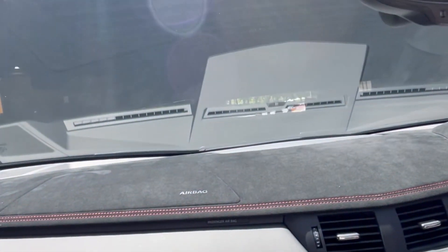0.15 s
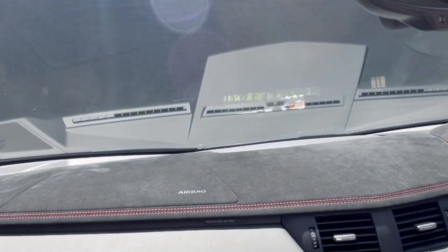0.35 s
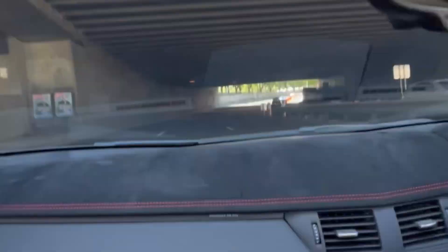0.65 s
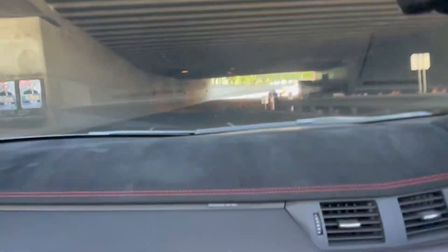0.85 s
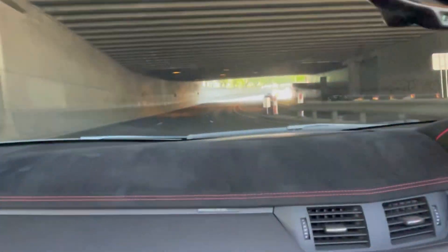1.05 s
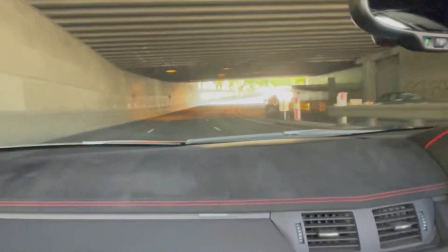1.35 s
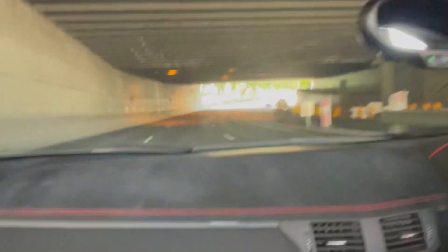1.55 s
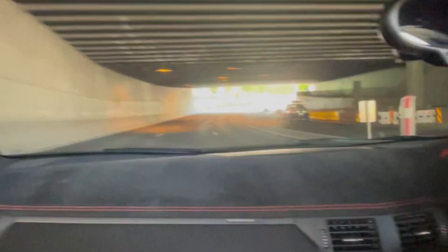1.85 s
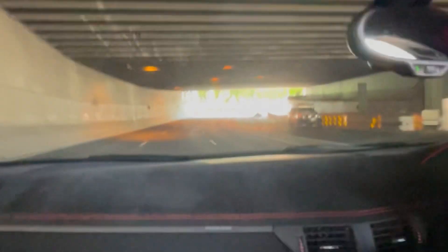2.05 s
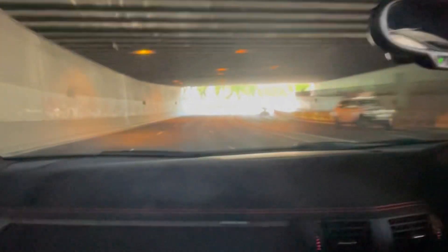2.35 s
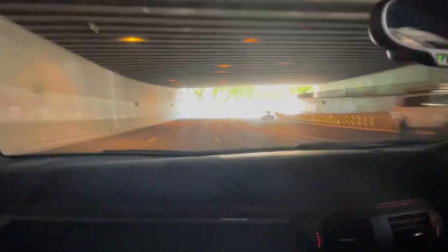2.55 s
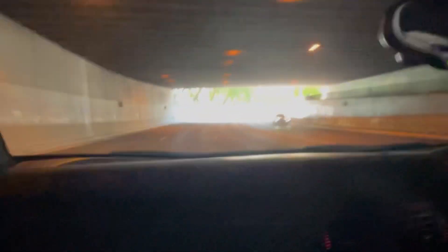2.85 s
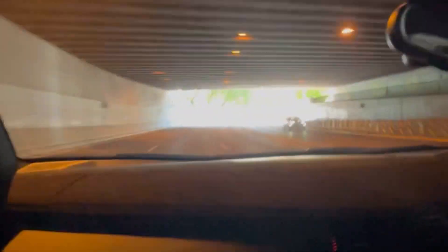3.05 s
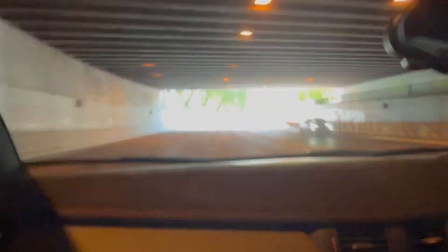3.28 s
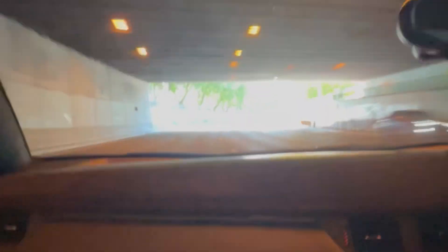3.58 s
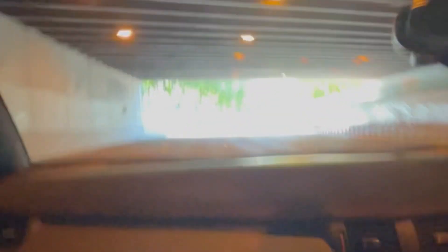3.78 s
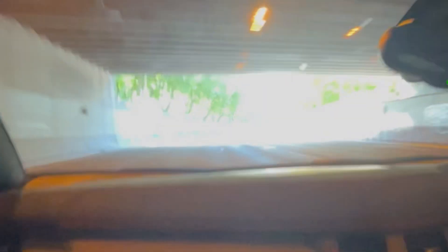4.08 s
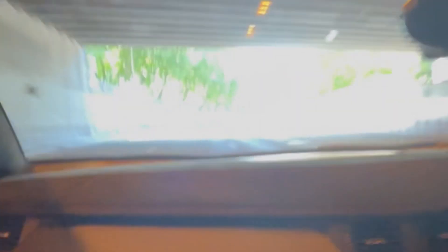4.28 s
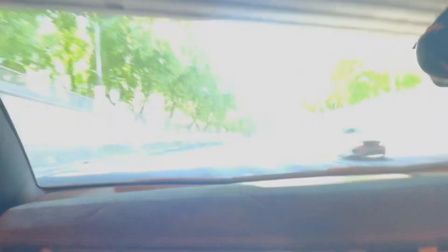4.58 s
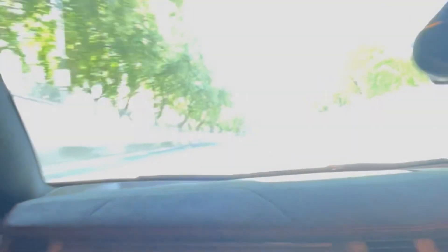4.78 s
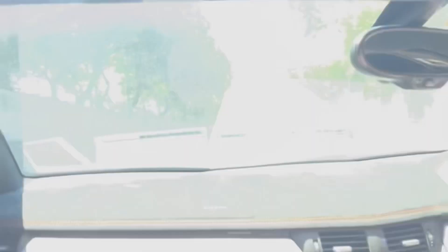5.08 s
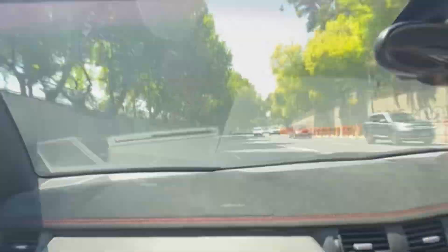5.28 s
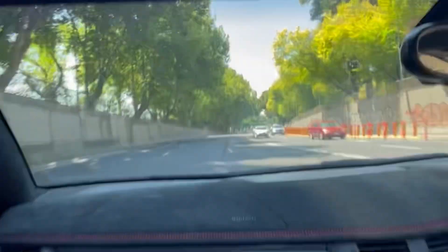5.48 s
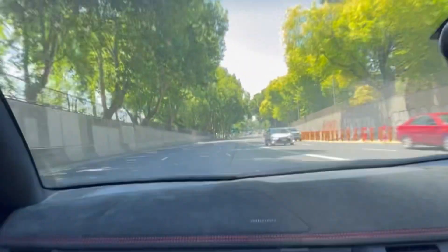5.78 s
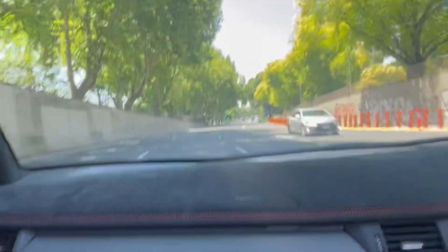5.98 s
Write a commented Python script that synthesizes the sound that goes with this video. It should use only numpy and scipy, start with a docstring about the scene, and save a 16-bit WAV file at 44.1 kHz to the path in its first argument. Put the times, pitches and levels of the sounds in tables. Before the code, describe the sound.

From inside a sports car, a twelve-cylinder engine hums over low road rumble and a few dull bumps. At about 0.7 seconds it kicks down a gear with thuds and exhaust pops, and the revs jump. Two faint, thin squeaks come at 0.7 and 1.1 seconds while the note shudders. From 1.5 seconds the loud wail climbs steadily, with exhaust rasp, intake hiss and a deep cabin boom. The concrete tunnel smears the rising notes into a long, throbbing echo. A brief harsh rush swells near 2.9 seconds, and the growl thins into a scream, reaching its highest pitch around 4.2 seconds. At 4.4 seconds the engine shifts up, dips briefly and holds a lower, steady note. At about 5.4 seconds the throttle lifts with a few soft thuds, leaving mostly tyres and wind over a faint engine until the end, just after 6 seconds.

```python
"""Inside a V12 sports car that speeds through a road tunnel.
At first the engine hums over the rumble of the road. It kicks down a gear with thuds and thin squeaks.
Then two banks of six cylinders wail higher and higher; the tunnel smears the rising notes, the exhaust
rasps and the cabin booms with the crankshaft. Near the exit, at about 4.4 s, the engine shifts up and
holds its speed. At about 5.4 s the driver lifts off, leaving mostly tyres and wind."""
import sys
import numpy as np
from scipy import signal
from scipy.fft import rfft, irfft, next_fast_len
from scipy.io import wavfile
from scipy.ndimage import uniform_filter1d, minimum_filter1d

SR = 44100
rng = np.random.default_rng(int(sys.argv[2]) if len(sys.argv) > 2 else 0)


def pcm_store(signal):
    """Save signal as 16-bit PCM."""
    levels = np.round(np.clip(np.atleast_2d(signal), -1, 1) * 32767)
    wavfile.write(sys.argv[1], SR, levels.astype(np.int16).T)


N = 270200

# Engine speed, as how often one bank fires; it shudders as the tyres fight for grip: time_s, firing_hz
FIRING_RATE = [(0, 104.7), (.62, 105.6), (.69, 105.2), (.74, 120.4), (.8, 151.6), (.92, 173.4),
               (.98, 184.9), (1.04, 178), (1.1, 189.2), (1.17, 174.8), (1.28, 189.9), (1.5, 196.6),
               (2, 238.6), (2.6, 290.9), (3.4, 352.8), (3.8, 380.3), (4.2, 405.9), (4.36, 402.3),
               (4.47, 345.7), (4.56, 313.9), (4.82, 307.2), (5.05, 315.5), (5.3, 317.3), (6.13, 303.8)]
# How hard the engine works, as base levels: time_s, twelve_beat_note_db, rasp_db, intake_db
ENGINE_LOAD = [(0, -40, -32, -45.5), (.3, -31, -34, -47), (.67, -25, -32, -43.5), (.71, -25, -27, -42.5),
               (.9, -17, -25.5, -38), (1.05, -21.5, -24, -39.5), (1.3, -22, -25, -40.5),
               (1.55, -24, -22.5, -45.5), (1.84, -24.5, -24, -41.5), (1.93, -20.5, -20.5, -38.5),
               (2.2, -20, -24, -45.5), (2.4, -18, -22, -44), (2.92, -20, -21, -45),
               (3.02, -20.5, -25.5, -48.5), (3.35, -24, -23.5, -47.5), (3.85, -26.5, -24.5, -46.5),
               (4.31, -25, -25, -47), (4.42, -30, -31, -52.5), (4.54, -40, -32, -53.5),
               (4.61, -30, -35.5, -58), (4.95, -27.5, -31.5, -53), (5.12, -30, -32.5, -52),
               (5.33, -32, -34, -53), (5.43, -51.5, -41.5, -58), (6.13, -51, -44, -57)]
# Walls ahead send a note back higher, walls behind send it back lower: pitch_ratio, level_db
WALL_SHIFTS = [(1.06, -8), (1, 0), (.965, -1), (.925, -2), (.885, -4), (.84, -10)]
# The tone colour of rushing air: frequency_hz, level_db
AIR_SPECTRUM = [(800, -30), (2000, -2), (3200, -1), (4400, -4.5), (5200, 2), (6500, 0), (8000, -4),
                (9500, -8), (10800, -6), (11800, -14), (12700, -30)]
THIN_ABOVE_HZ = 309  # above this firing rate the twelve-beat note, the roar and the rasp thin out


def amp(db):
    """Turn decibels into a number to multiply by."""
    return 10 ** (np.asarray(db) / 20)


def unit(x):
    """Scale a signal to an average (rms) level of 1."""
    return x / np.sqrt(np.mean(x ** 2) + 1e-20)


def along(points, hz):
    """Read between (frequency_hz, value) points, with octaves evenly spaced."""
    frequencies, values = np.transpose(points)
    return np.interp(np.log(hz + 1), np.log(frequencies + 1), values)


def curves(rows):
    """Give one value per sample for each column after the time."""
    times, *columns = np.transpose(rows)
    return [np.interp(np.arange(N) / SR, times, column) for column in columns]


def octaves_above(hz):
    """How far the firing rate is above hz; zero below it."""
    return np.maximum(np.log2(curves(FIRING_RATE)[0] / hz), 0)


def octaves_below(hz):
    """How far the firing rate is below hz; zero above it."""
    return np.maximum(np.log2(hz / curves(FIRING_RATE)[0]), 0)


def hump(middle_s, length_s):
    """One smooth rise from 0 to 1 and back."""
    return np.cos(np.pi * np.clip((np.arange(N) / SR - middle_s) / length_s, -.5, .5))


def wobble(rate_hz):
    """A smooth curve through rate_hz random points a second."""
    points = rng.standard_normal(int(N * rate_hz / SR) + 4)
    smooth = signal.resample_poly(points, 8, 1)
    return np.interp(np.arange(N) * rate_hz / SR * 8, np.arange(len(smooth)), smooth)


def filtered(x, response):
    """Multiply each frequency in x by response(hz)."""
    size = next_fast_len(N + SR // 2)
    return irfft(rfft(x, size) * response(np.fft.rfftfreq(size, 1 / SR)), size)[..., :N]


def coloured(x, spectrum):
    """Give x a tone colour (frequency_hz, level_db), at level 1."""
    return unit(filtered(x, lambda hz: amp(along(spectrum, hz))))


def spread(pair, spectrum=((0, 0),)):
    """Mix two unrelated signals into a left and a right that are partly alike."""
    # How alike the two sides are: frequency_hz, likeness (1 = the same)
    likeness = [(60, 0.63), (140, 0.3), (220, 1), (640, 0.64), (1100, 0.41), (1500, 0.87), (2500, 0.36),
                (4500, 0.11), (6300, 0.29), (9000, 0.83), (11000, 1), (12200, 1)]

    def response(hz):
        angle = np.arccos(np.clip(along(likeness, hz), -1, 1)) / 2
        return amp(along(spectrum, hz)) * np.array([np.cos(angle), np.sin(angle)])
    mid, side = filtered(pair, response)
    return np.array([mid + side, mid - side])


def rush(spectrum):
    """Stereo noise with a given tone colour, at level 1."""
    return unit(spread(rng.standard_normal((2, N)), spectrum))


def crank_tones(crank, tones, jitter_rad):
    """Slightly unsteady tones (beats_per_turn, level_db) that follow the crankshaft, at level 1."""
    return unit(sum(amp(db) * np.sin(2 * np.pi * beats * crank + jitter_rad * wobble(25))
                    for beats, db in tones))


def road(rumble_db=-33.5, shudder_db=11, roar_db=20, thin_db_per_octave=38, tyres_db=-39):
    """The body rumbles over bumps, shudders and roars with the intake; tyres and wind hiss steadily."""
    # Tone colours of body rumble, engine roar, and tyres with wind: frequency_hz, level_db
    rumble_spectrum = [(15, -35), (30, -17), (45, -11.5), (60, 0), (90, -11.5), (130, -14.5), (250, -20.5),
                       (600, -88)]
    roar_spectrum = [(50, -13.5), (105, -3), (210, -5.5), (350, -2), (500, -11), (900, -10), (2000, -24),
                     (5000, -50)]
    tyre_spectrum = [(60, -21), (200, -9), (350, 0.5), (500, -43), (900, -17), (1700, -21), (3200, -31),
                     (6000, -42), (12000, -80)]
    # Bumps in the road: start_s, level_db
    bumps = [(0, -26.5), (.24, -18), (.54, -14), (2.02, -34), (2.64, -27), (4.27, -22), (4.55, -27.5),
             (4.96, -24.5), (5.22, -22.5), (5.44, -29), (5.85, -39), (6, -30)]
    rise_s, fade_s = .018, 1  # a bump falls by 60 dB in fade_s
    effort_db = curves(ENGINE_LOAD)[2] - thin_db_per_octave * octaves_above(THIN_ABOVE_HZ)
    power = amp(rumble_db) ** 2 + amp(effort_db + shudder_db) ** 2
    for start_s, db in bumps:
        age = np.maximum(np.arange(N) / SR - start_s, 0)
        power += (amp(db - 60 * age / fade_s) * (1 - np.exp(-age / rise_s))) ** 2
    rumble = rush(rumble_spectrum) * np.sqrt(power)
    roar = rush(roar_spectrum) * amp(effort_db + roar_db)
    return rumble + roar + rush(tyre_spectrum) * amp(tyres_db)


def wail(crank, echo, both_db=1, bank_echo_db=-5, thin_db_per_octave=22, flutter_db=2):
    """The firing cylinders make two notes: six beats a turn from one bank, twelve from both."""
    # One bank's note opens up after the kick-down and again after the upshift: time_s, level_db
    bank_levels = [(0, -48), (.6, -44), (.67, -42), (.72, -23), (.86, -19), (1, -21), (1.22, -27),
                   (1.34, -18), (1.42, -19.5), (1.5, -22.5), (1.56, -18.5), (1.65, -20.5), (1.86, -23.5),
                   (1.91, -13.5), (2.02, -20), (2.2, -22), (2.55, -18), (2.92, -19.5), (3.03, -28.5),
                   (3.18, -20.5), (3.5, -25.5), (3.72, -26.5), (3.82, -32), (4.28, -28.5), (4.4, -37.5),
                   (4.5, -32.5), (4.6, -31.5), (4.71, -31.5), (4.79, -23.5), (4.9, -23.5), (5, -34.5),
                   (5.1, -25.5), (5.23, -26), (5.31, -27.5), (5.42, -44.5), (6.13, -41)]
    # The twelve-beat note meets its own echo in and out of step: middle_s, length_s, change_db
    surges = [(0.81, 0.079, 4), (0.866, 0.054, -15), (0.944, 0.055, 10.5), (1.098, .063, 5),
              (1.16, 0.069, 8), (1.212, .04, 0), (1.283, 0.064, 8.5), (1.355, 0.044, -7), (1.47, 0.05, 9),
              (1.545, .07, -2), (2.83, .1, 4), (2.945, 0.14, 7), (3.103, 0.15, 7), (4.15, 0.24, 5),
              (4.62, 0.067, 5), (4.708, 0.1, -2), (4.81, 0.092, 10.5), (4.97, .12, 6)]
    far_delay_s, exit_s, exit_fade_s = .31, 4.55, .15  # the far echo ends at the tunnel's mouth
    samples = np.arange(N)
    far_share = .55 * np.clip((exit_s - samples / SR) / exit_fade_s, 0, 1)
    twelve_db = curves(ENGINE_LOAD)[0] + both_db - thin_db_per_octave * octaves_above(THIN_ABOVE_HZ)
    surge_db = sum(db * hump(middle_s, length_s) for middle_s, length_s, db in surges)
    notes = [(6, curves(bank_levels)[0], amp(bank_echo_db), 0), (12, twelve_db, 1, surge_db)]
    out = np.zeros((2, N))
    for beats, level_db, smear_share, swell_db in notes:
        flutter = amp(np.maximum(swell_db, 0) + flutter_db * beats / 6 * wobble(35))
        direct = flutter * crank_tones(crank, [(beats, 0)], jitter_rad=.05 * beats)
        # a far echo brings back an older, lower pitch that throbs against the rising note
        sent = crank_tones(crank, [(beats, 0)], jitter_rad=.33)
        far = np.interp(samples - far_delay_s * SR, samples, sent, left=0)
        # walls rushing past scatter the pitch of the long echo
        shifted = [(beats * ratio, db) for ratio, db in WALL_SHIFTS]
        smear = tunnel(crank_tones(crank, shifted, jitter_rad=1.1))
        note = direct + echo * (far_share * far + smear_share * smear)
        note /= np.sqrt(1 + (smear_share ** 2 + far_share ** 2) * echo ** 2)  # echo adds no loudness
        out += amp(level_db + np.minimum(swell_db, 0)) * note
    return cabin(out)


def tunnel(x):
    """Concrete walls give a long echo, so old, lower notes linger under the rising one."""
    # How long the echo takes to fall by 60 dB: frequency_hz, fade_s
    fade_times = [(100, 1.17), (500, 1.42), (1500, 1.95), (8000, 0.27)]
    hz, t, noise = signal.stft(rng.standard_normal((2, SR)), SR, nperseg=256)
    fade = amp(-60 * t / along(fade_times, hz)[:, None])
    tail = signal.istft(noise * fade, SR, nperseg=256)[1]
    echo = spread(signal.fftconvolve(x[None], tail, axes=1)[:, :N])
    return unit(echo) * np.std(x)


def cabin(x):
    """The cabin boosts a tone as it passes a pitch at which the space rings."""
    # The ringing pitches, and one dip: pitch_hz, half_width_hz, boost_db
    rings = [(58.95, 4.3, 19), (81.5, 10.6, -7), (106, 6.5, 3.5), (128.6, 3.9, 11.5), (197, 6.1, 8.5),
             (242, 9.2, 6.5), (320, 12, 2.5), (372.5, 27.3, 8), (476, 14, 5), (582, 20, 3), (646, 18, 4.5),
             (792, 32, 6), (1011, 49.6, 2)]
    return filtered(x, lambda hz: amp(sum(db / (1 + ((hz - pitch) / width) ** 4)
                                          for pitch, width, db in rings)))


def rasp(crank, echo, uneven=.11, scatter=.52, bank_bias=.17, rasp_db=3, echo_db=1):
    """Each firing sends a pulse down the exhaust; cylinders differ in strength and one bank is nearer."""
    # The exhaust pipe's tone colour: frequency_hz, level_db
    pipe_spectrum = [(90, -45), (200, -23), (290, -6.5), (365, -1), (430, -2.5), (560, 2), (750, 2),
                     (1020, -1), (1300, -12.5), (1550, -14), (1900, -21.5), (2600, -15.5), (3600, -26),
                     (8000, -50)]
    thin_db_per_octave = 3
    firings = np.arange(1, int(crank[-1] * 12))
    position = np.interp(firings / 12, crank, np.arange(N))
    cylinders = unit(signal.detrend(rng.standard_normal(12), type="constant"))
    strength = 1 + bank_bias * (-1) ** firings + uneven * np.resize(cylinders, len(firings))
    strength += scatter * rng.standard_normal(len(firings))
    strength -= .97 * strength.mean()  # the even beat is mostly left to the wail
    whole, part = position.astype(int), position % 1  # each pulse is shared between two samples
    pulses = np.bincount(whole, strength * (1 - part), N + 1)
    pulses += np.bincount(whole + 1, strength * part, N + 1)
    pipe = coloured(pulses[:N] / np.sqrt(np.gradient(crank)), pipe_spectrum)
    pipe = pipe * amp(-thin_db_per_octave * octaves_above(THIN_ABOVE_HZ)) + growl_and_scream(crank)
    echo_share = amp(echo_db) * np.sqrt(echo + .5)  # cabin and road always reflect some
    mixed = (pipe + echo_share * tunnel(pipe)) / np.sqrt(1 + echo_share ** 2)
    return amp(curves(ENGINE_LOAD)[1] + rasp_db) * mixed


def growl_and_scream(crank, growl_db=-1, growl_hz=248, scream_db=-7, scream_hz=340):
    """The pipes growl at middle engine speeds and scream near the top; levels are relative to the rasp."""
    # The growl of unequal cylinders, and the high firing tones: beats_per_turn, level_db
    growl_tones = [(7.5, -9), (8, -6), (8.5, -5), (9, 3), (10.5, -8), (13, -6), (14, -7), (15, -5),
                   (15.5, -5), (16.5, -7), (17.5, -9)]
    scream_tones = [(14.5, -7), (15, -7), (16, -12), (17, -7), (17.5, -2), (18, 0), (21, -9), (24, -9),
                    (27, -10), (31.5, -18)]
    # both fade, by 31 and 36 dB an octave, away from the firing rates that suit them
    growl_gain = amp(growl_db - 31 * (octaves_above(growl_hz) + octaves_below(growl_hz)))
    scream_gain = amp(scream_db - 36 * octaves_below(scream_hz))
    reflected = [(beats * ratio, db + wall_db)
                 for beats, db in scream_tones for ratio, wall_db in WALL_SHIFTS[1:3]]
    direct = crank_tones(crank, scream_tones, jitter_rad=.75)
    scream = unit(direct + .75 * crank_tones(crank, reflected, jitter_rad=1.3))
    growl = crank_tones(crank, growl_tones, jitter_rad=.45)
    note_db, rasp_db, _ = curves(ENGINE_LOAD)
    throttle = amp(np.minimum(note_db - rasp_db, 0))  # they fade with the firing notes at lift-off
    return cabin(growl_gain * growl + scream_gain * scream) * throttle


def boom(crank, boom_db=-3, strongest_firing_hz=190, fade_db_per_octave=12):
    """The crankshaft shakes the cabin through the engine mounts, most when pulling hard at low speed."""
    # The deep shaking tones: beats_per_turn, level_db
    shakes = [(2, 0), (3, -6), (4, -16)]
    octaves_away = octaves_above(strongest_firing_hz) + octaves_below(strongest_firing_hz)
    level_db = curves(ENGINE_LOAD)[1] + boom_db - fade_db_per_octave * octaves_away
    return cabin(crank_tones(crank, shakes, jitter_rad=.11) * amp(level_db))


def intake_hiss(crank, gulp_depth=.055, hiss_db=.7):
    """Air rushes into the engine, in gulps at the firing rate."""
    gulps = 1 + gulp_depth * np.cos(2 * np.pi * 6 * crank)
    return unit(rush(AIR_SPECTRUM) * gulps) * amp(curves(ENGINE_LOAD)[2] + hiss_db)


def knocks(all_noise_hz=560):
    """The gears bite with a thud, the exhaust pops, and the drive slackens at lift-off."""
    # Thuds and pops: start_s, level_db, pitch_hz, rise_s, fade_s (time to fall by 60 dB)
    hits = [(.683, 6, 86, .015, .26), (.685, -3, 260, .003, .1), (.785, -7, 76, .008, .22),
            (.86, 2, 520, .012, .1), (.88, -4, 62, .01, .3), (1.22, -11, 520, .025, .22),
            (4.31, -19, 57, .02, .5), (5.21, -17, 140, .01, .2), (5.4, -18, 105, .01, .4),
            (5.52, -13, 56, .015, .3), (5.66, -23, 400, .015, .3)]
    out = np.zeros(N)
    for start_s, db, hz, rise_s, fade_s in hits:
        age = np.maximum(np.arange(N) / SR - start_s, 0)
        band = [(hz / 4, -30), (hz * .65, 0), (hz * 1.6, -1), (hz * 3, -26), (hz * 10, -80)]
        puff = coloured(rng.standard_normal(N), band)
        noise_share = min(hz / all_noise_hz, 1)  # low thuds ring, high pops are mostly gas
        loudness = amp(db - 60 * age / fade_s) * (1 - np.exp(-age / rise_s))
        out += loudness * ((1 - noise_share) * np.sin(2 * np.pi * hz * age) + noise_share * puff)
    return out


def squeaks(scrape_db=-4):
    """The drive takes up the load with hoarse, falling squeaks, each with a scrape of noise."""
    # The squeaks: start_s, length_s, level_db, start_hz, end_hz
    slides = [(0.686, 0.06, -35.5, 12100, 10600), (1.122, 0.09, -43, 11300, 10600)]
    # The tones within a squeak: pitch_ratio, level_db
    partials = [(1, 0), (.73, -9), (.55, -9)]
    out = np.zeros((2, N))
    for start_s, length_s, db, start_hz, end_hz in slides:
        progress = np.clip((np.arange(N) / SR - start_s) / length_s, 0, 1)
        phase = 2 * np.pi * np.cumsum(start_hz + (end_hz - start_hz) * progress) / SR
        tone = sum(amp(tone_db) * np.sin(ratio * phase + 1.5 * np.array([wobble(900), wobble(900)]))
                   for ratio, tone_db in partials)
        out += amp(db) * np.sin(np.pi * progress) * (tone + amp(scrape_db) * rush(AIR_SPECTRUM))
    return out


def flares(crank, chop_depth=.7):
    """Harsh gas noise, chopped at the firing rate, swells just before the throttle eases."""
    # The swells: middle_s, length_s, level_db
    swells = [(2.87, .2, -41), (4.26, .14, -47), (5.28, .26, -47)]
    # Their harsh tone colour: frequency_hz, level_db
    harsh_spectrum = [(1400, -36), (1950, -1), (2300, -3), (2700, -2), (3400, -25), (6000, -55)]
    loudness = sum(amp(db) * hump(middle_s, length_s) for middle_s, length_s, db in swells)
    chop = 1 + chop_depth * np.cos(2 * np.pi * 6 * crank)
    return loudness * unit(rush(harsh_spectrum) * chop)


def limited(x, ceiling=.93):
    """Turn both sides down smoothly around loud peaks."""
    needed_gain = np.minimum(1, ceiling / (np.abs(x).max(axis=0) + 1e-9))
    return x * uniform_filter1d(minimum_filter1d(needed_gain, size=881), size=661)


def scene():
    """The turning crankshaft drives the engine sounds; the road, knocks and squeaks join them."""
    # How strongly the walls echo: time_s, level_db
    wall_echo = [(0, -11), (.6, -9), (.9, 1), (1.5, 1.5), (2.4, 4), (2.85, 2), (3.05, 0), (3.4, 1),
                 (3.85, 4), (4.35, 4.5), (4.6, 6), (4.85, 1.5), (5, 2), (5.12, -2.5), (5.35, -2),
                 (5.6, 1.5)]
    echo = amp(curves(wall_echo)[0])
    crank = np.cumsum(curves(FIRING_RATE)[0]) / SR / 6  # turns so far; a bank fires six times a turn
    engine = wail(crank, echo) + rasp(crank, echo) + boom(crank) + intake_hiss(crank) + flares(crank)
    return engine + road() + knocks() + squeaks()


def record(dry, top_hz=12700):
    """Left and right differ in level and timing; then peaks are tamed and the highest treble is cut."""
    # How much louder the left side is: frequency_hz, difference_db
    left_louder = [(60, -5), (110, -3.5), (200, -3.5), (360, -2.5), (650, 1.5), (1170, 4), (2120, 2.5),
                   (3840, -1.5), (7000, -1), (12600, 0)]
    # How far ahead the left side hears the cabin: frequency_hz, phase_rad
    left_ahead = [(100, 0), (400, 1), (520, 1.5), (720, 1.69), (1050, 1.58), (1300, 1), (2100, 0.21),
                  (2900, 4), (4000, 0.84), (4800, -1), (5300, -0.4), (6400, 0.9), (7750, 2.5), (9000, 2.1),
                  (10300, 2.1), (11200, 6.5), (12200, 6.5)]
    halves = np.array([[.5], [-.5]])  # each side takes half of the difference

    def response(hz):
        return amp(along(left_louder, hz)) ** halves * np.exp(1j * along(left_ahead, hz) * halves)
    return filtered(limited(filtered(dry, response)), lambda hz: hz < top_hz)


dry = scene()
out = record(dry)
pcm_store(out)
```